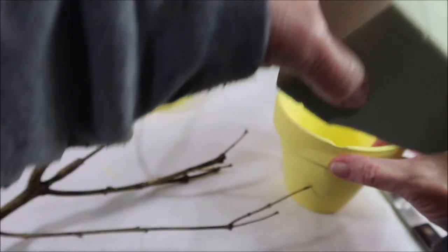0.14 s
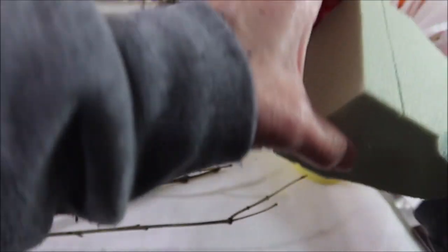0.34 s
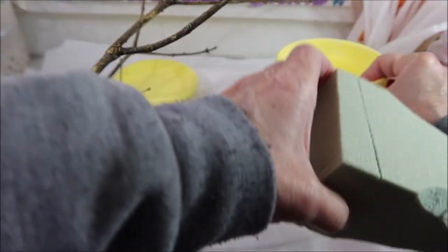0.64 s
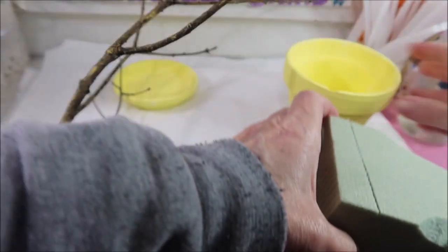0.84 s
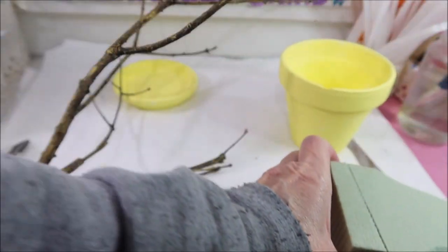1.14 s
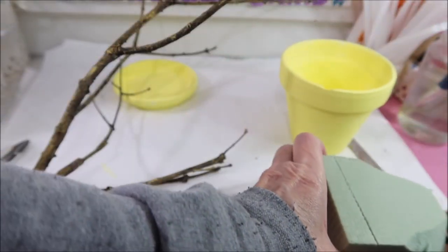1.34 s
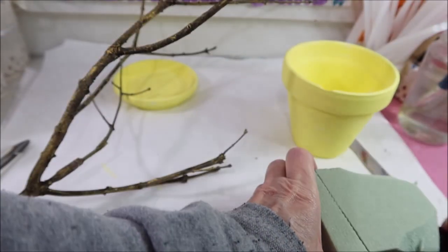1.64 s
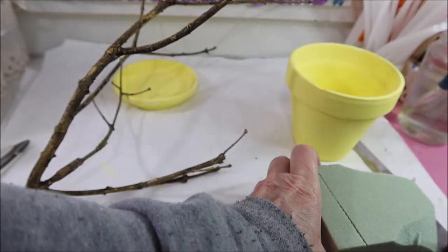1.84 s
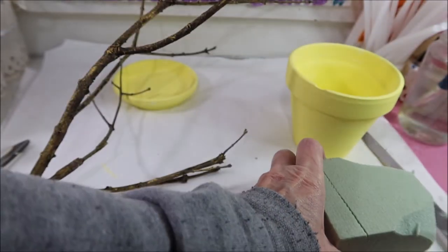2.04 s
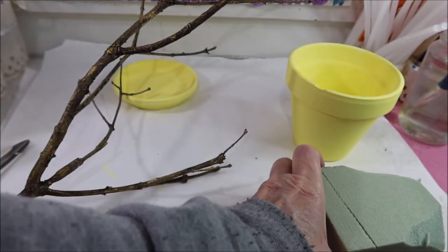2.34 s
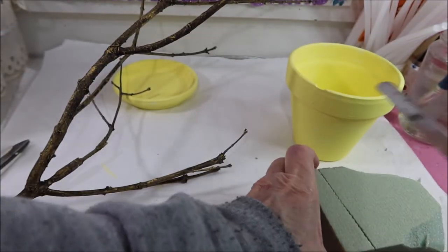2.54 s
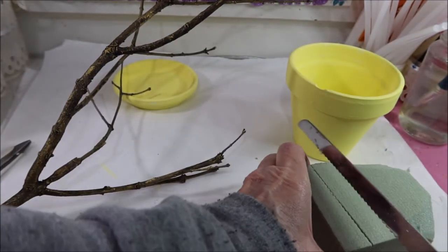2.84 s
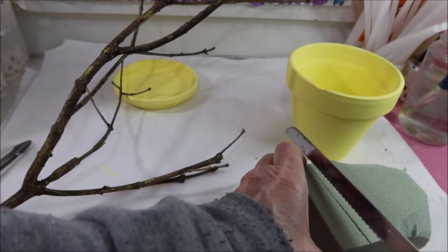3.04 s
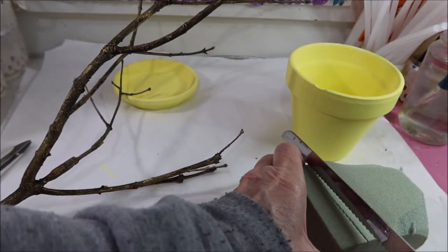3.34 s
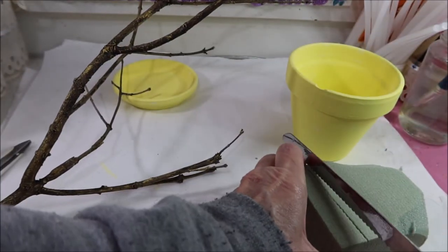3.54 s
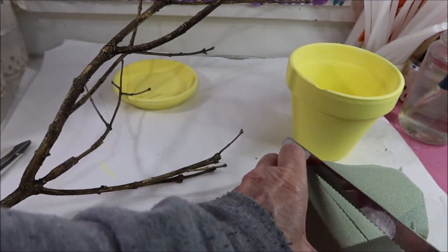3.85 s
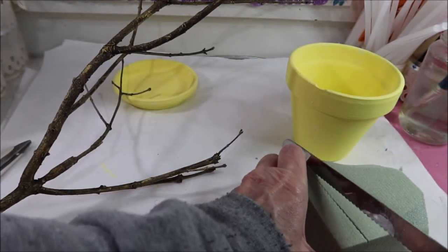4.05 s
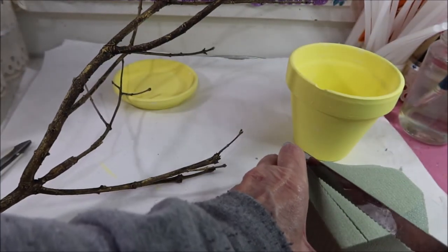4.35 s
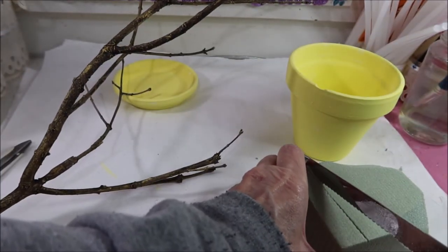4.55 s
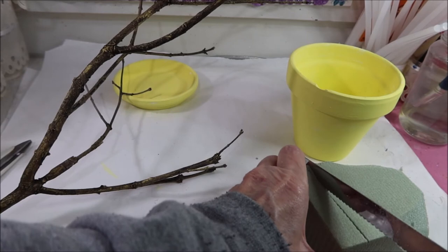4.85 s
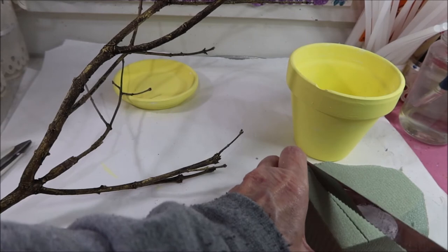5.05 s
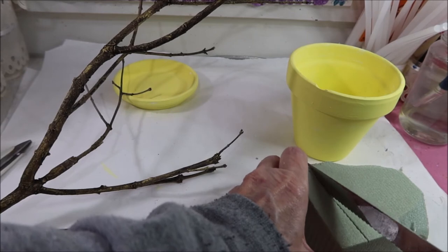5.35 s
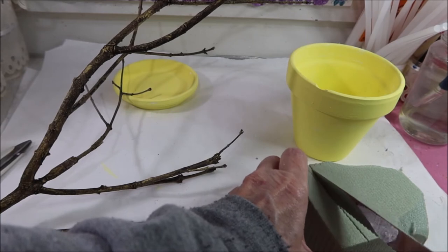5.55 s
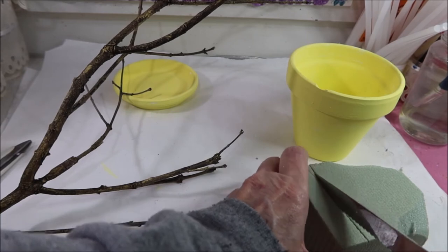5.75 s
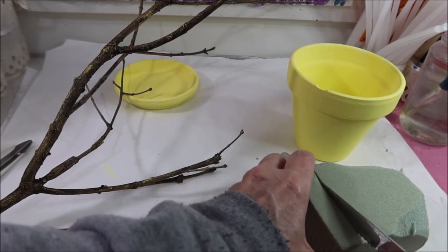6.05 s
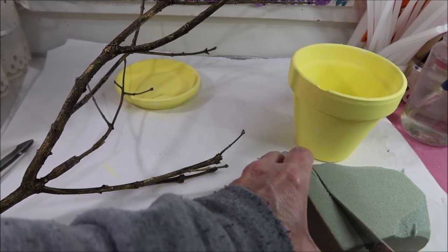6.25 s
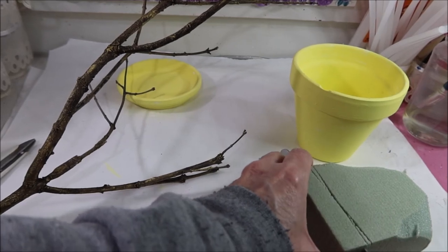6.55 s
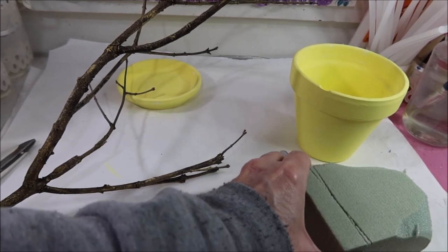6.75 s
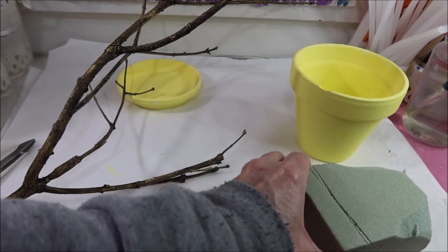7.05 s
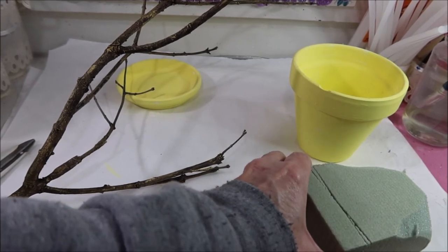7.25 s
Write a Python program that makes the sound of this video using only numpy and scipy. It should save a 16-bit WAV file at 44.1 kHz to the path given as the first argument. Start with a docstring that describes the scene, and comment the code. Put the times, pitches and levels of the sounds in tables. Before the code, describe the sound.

Dry foam rustles and scuffs on a papered table, a clay pot lands with a loud double knock, then a serrated knife rasps scratchily through foam.

```python
"""At a papered work table in a quiet room, a hand slides a clay pot and a block of dry foam: filtered grit
rustles and scuffs. At 0.9 s the pot is set down with a knock and a bounce that ring the table's modes.
From 3.1 s a serrated knife bites in short slips and strokes, then one long push: random cell bursts ring
the block. Two close microphone ports hear the foam from the right; a short echo follows every sound, and
noise of air and far machinery runs throughout."""
import sys
import numpy as np
from scipy import signal
from scipy.fft import rfft, irfft
from scipy.io import wavfile
from scipy.ndimage import uniform_filter1d, map_coordinates

SR = 44100
rng = np.random.default_rng(int(sys.argv[2]) if len(sys.argv) > 2 else 0)


def waveform_to_disk(signal):
    """Save audio, clipped to [-1, 1], as 16-bit WAV at the path in sys.argv[1]."""
    frames = np.transpose(np.atleast_2d(signal))
    scaled = np.clip(frames, -1, 1) * 32767
    samples = np.round(scaled).astype(np.int16)
    wavfile.write(sys.argv[1], SR, samples)


N = 325899

# moments when the teeth break loose: t/s, peak level/dB
SLIPS = [(3.1137, -26.5), (3.1605, -35), (3.262, -35), (3.3049, -32), (3.3277, -23.5), (3.47, -32.5),
         (3.5349, -32), (3.5598, -31.5), (3.6407, -27.5), (3.6575, -30.5), (3.688, -30.5), (3.7315, -19.5),
         (3.8116, -32), (3.9135, -28.5), (3.9654, -34), (4.0148, -36.5), (4.0707, -32.5), (4.1245, -38),
         (4.144, -25.5), (4.2253, -21.5), (4.3051, -23), (4.3615, -34.5), (4.3824, -34), (4.4159, -12.5),
         (4.4682, -27.5), (4.491, -15.5), (4.5232, -13.5), (4.599, -18), (4.618, -13.5), (4.643, -22),
         (4.7184, -17), (4.771, -17.5), (4.8244, -28.5), (4.8688, -34), (4.8954, -25), (4.9182, -25.5),
         (4.9462, -16.5), (4.9686, -13), (5.187, -32), (5.278, -29.5), (5.2992, -16), (5.3154, -18),
         (5.398, -27.5), (5.4246, -14), (5.4494, -23), (5.4744, -23.5), (5.5443, -16), (5.6007, -14.5),
         (5.6237, -15.5), (5.655, -22.5), (5.7673, -27.5), (5.8067, -34), (5.917, -22), (5.96, -20),
         (6.0147, -34), (6.048, -22), (6.2874, -24), (6.643, -19), (6.6777, -17), (6.9027, -19),
         (6.9226, -16), (7.153, -23)]
# the long push through the block: t/s, rasp level/dB, extra brightness/dB
PUSH = [(5.7, -49, 0), (5.822, -38, 3), (6.024, -35.5, 3), (6.07, -21, -0.5), (6.108, -30.5, 0),
        (6.254, -32, 1.5), (6.31, -23, -1.5), (6.594, -27, 1), (6.632, -31, 3), (6.706, -22.5, 5),
        (6.782, -32.5, 0), (6.848, -25.5, 0.5), (6.89, -29, -1), (6.928, -22, -1), (7.102, -22, -2),
        (7.13, -27, -2), (7.154, -18.5, 2.5), (7.214, -22, -2), (7.248, -46.5, -5), (7.36, -49.5, 13),
        (7.38, -19.5, 0.5), (7.39, -14.5, 2.5)]
# the pot's foot dragged over the table: start t/s, length/s, first level/dB, last level/dB,
# table rumble re drag/dB
DRAGS = [(0.24, 0.35, -47, -51.5, 7), (0.727, 0.083, -63, -70, 14), (0.818, 0.14, -40.5, -50, 2),
         (.95, 0.053, -56, -52, 5), (1.14, 0.023, -45, -56, -8), (1.356, 0.32, -53.5, -62, -4),
         (1.67, .14, -54.5, -51.5, -6), (1.838, 0.29, -50, -52.5, -0.5), (2.2, 0.13, -67, -62, -1)]
CREST_DB = 11.5  # a spray of grains is taken to peak this far above its rms level


def saw(tear):
    """Tearing cells ring the block as a bright rasp over a hollow body, both changing with the cut's depth."""
    # rasp spectra, in mid cut and for the shallow and last stages: f/Hz, relative level per Hz/dB
    rasp_spectrum = [(1120, -37), (1900, -19), (1950, -16), (2500, 1.5), (3290, -5), (3920, -6.5),
                     (4600, -7.5), (7620, -10), (13700, -14.5), (14900, -13.5), (15700, -52)]
    outer_spectrum = [(1120, -38), (1900, -17), (2300, 0.5), (4000, -4), (7600, -8.5), (13700, -12.5),
                      (14900, -11.5), (15700, -50)]
    # block resonances in mid cut, while shallow, and as the halves part: f/Hz, width/Hz, level/dB
    block_modes = [(2275, 28, 11.5), (2424, 39, 1.5), (2440, 20, 3), (2680, 30, 4), (2910, 110, 9),
                   (3140, 36, 5), (3463, 120, 1.5), (3813, 190, 7), (3750, 28, 1), (5550, 310, 4.5),
                   (8300, 47, 0)]
    whole_modes = [(2330, 71, 7.5), (2459, 56, 9), (2608, 71, 8), (3753, 150, 8.5), (4690, 120, 4),
                   (5450, 260, 4), (6480, 120, 5.5)]
    parting_modes = [(2770, 27, 8.5), (2890, 38, 6), (3520, 99, 7), (3963, 86, 10.5), (4360, 53, 5),
                     (4900, 100, 6.5), (6550, 140, 5)]
    # body spectra in mid cut, while shallow, and near the far side: f/Hz, relative level per Hz/dB
    body_spectrum = [(260, -54), (450, -13), (631, -5), (818, -8), (910, 0.5), (1350, 2), (1950, -5.5),
                     (2200, 1.5), (2860, -4.5), (4840, -120)]
    shallow_spectrum = [(260, -38), (450, -14), (661, -31), (740, 5), (807, -0.5), (972, 3.5), (1300, -1),
                        (2200, -1), (2860, -18), (4840, -120)]
    through_spectrum = [(260, -28), (450, -15), (807, -12.5), (1070, -1.5), (1240, -5), (1660, -0.5),
                        (1950, -11.5), (2200, -0.5), (2860, -34), (4840, -120)]
    # hollow resonances of the deeper cut: f/Hz, width/Hz, level/dB
    hollow_modes = [(1090, 550, 5.5), (1384, 62, 4), (1746, 150, 9.5)]
    # t/s: the cut deepens over the first two times and nears the far side over the last two
    depth_times = (4.9, 5.6, 6.7, 6.95)
    # body re rasp at those four times: level/dB
    body_levels = (-10.5, -5.5, -3, -6)
    split_hz, snap_db = 3400, 9  # snap re rms of the other cells
    upper_db, upper_db_per_db, reference_db = -2.5, -0.14, -20.5  # upper rasp re whole rasp at reference tear

    t = np.arange(N) / SR
    cells = unit(crackle(12000, spread_db=1.5))
    # each slip opens with the snap of one cell wall
    slip_samples = (np.array(SLIPS)[:, 0] * SR).astype(int)
    cells[slip_samples] += undb(snap_db)

    # a lighter touch moves the same power from the lower to the upper rasp
    tear_db = 20 * np.log10(uniform_filter1d(tear, size=400).clip(1e-4))
    extra_db = (t > PUSH[0][0]) * curves(PUSH)[1]
    upper_share = undb(upper_db + upper_db_per_db * (tear_db - reference_db) + extra_db) ** 2
    upper_share = np.clip(upper_share, .05, .9)

    shallow = np.interp(t, depth_times, (1, 0, 0, 0))
    through = np.interp(t, depth_times, (0, 0, 0, 1))
    midway = 1 - shallow - through
    rasp = shallow * colour(cells, outer_spectrum, whole_modes)
    rasp += through * colour(cells, outer_spectrum, parting_modes)
    rasp += midway * colour(cells, rasp_spectrum, block_modes)

    upper = unit(high(rasp, split_hz, order=3)) * undb(0.74 * walk(23))
    lower = signal.sosfilt(signal.butter(3, split_hz, fs=SR, output="sos"), rasp)
    lower = unit(lower) * undb(1.9 * walk(32))
    rasp = np.sqrt(upper_share) * upper + np.sqrt(1 - upper_share) * lower

    body = shallow * colour(cells, shallow_spectrum)
    body += through * colour(cells, through_spectrum, hollow_modes)
    body += midway * colour(cells, body_spectrum, hollow_modes)
    body_db = np.interp(t, depth_times, body_levels) + 1.2 * walk(20)
    return tear * (rasp + undb(body_db) * body)


def bite():
    """How hard the blade tears: strokes and the long push, roughened by the teeth, with the slips on top."""
    # short strokes of the blade: start t/s, length/s, first level/dB, last level/dB
    short_strokes = [(3.145, 0.058, -74, -51), (3.242, 0.17, -58, -50.5), (3.478, 0.23, -46.5, -49),
                     (3.808, 0.19, -58, -51), (4.057, 0.13, -59, -44), (4.209, 0.096, -41, -39.5),
                     (4.347, 0.081, -58, -39), (4.478, .11, -37.5, -38), (4.601, 0.038, -28, -31.5),
                     (4.665, 0.14, -36, -41), (4.864, 0.11, -53.5, -31.5), (4.992, 0.091, -45.5, -50.5),
                     (5.122, 0.15, -58, -41.5), (5.304, 0.054, -23.5, -40.5), (5.412, 0.072, -34, -39.5),
                     (5.51, 0.058, -37, -30), (5.599, 0.093, -33.5, -42.5)]
    resting_db = -59.5  # the blade creeps in the cut between strokes
    slip_rise_s, slip_t60_s = 0.0033, 0.043

    t = np.arange(N) / SR
    creep = (t > SLIPS[0][0]) * undb(resting_db)
    push = np.where(t > PUSH[0][0], undb(curves(PUSH)[0]), creep)
    grab = np.hypot(strokes(*np.transpose(short_strokes)), push)
    grab = grab * undb(1.1 * walk(30)) * teeth(77, t60=0.058, depth=0.25)

    s, peak_db = np.transpose(SLIPS)
    slips = bursts(s, peak_db - CREST_DB, np.full(len(s), slip_t60_s), np.full(len(s), slip_rise_s))
    return np.hypot(grab, slips)


def teeth(rate, t60, depth):
    """Single teeth catch at random, each adding a short swell to a steady grip; rms 1."""
    catches = np.abs(crackle(rate, spread_db=-1.5))
    swell = signal.lfilter([1], [1, -1000. ** (-1 / (t60 * SR))], catches)
    return unit(1 + depth * uniform_filter1d(swell, size=60))


def rubbing():
    """Fine rustle of foam on paper, its colour wandering, over the duller drag of the pot's foot."""
    # foam and paper rubbed by hand: start t/s, length/s, first level/dB, last level/dB
    hand_moves = [(-0.03, 0.2, -46, -55.5), (0.188, .24, -46, -47), (0.436, 0.1, -57, -54),
                  (0.517, 0.11, -49, -49.5), (0.637, 0.16, -49.5, -53), (0.783, 0.054, -41, -48),
                  (0.89, 0.2, -53, -60), (1.086, 0.085, -49, -58), (1.241, 0.082, -51, -61),
                  (1.357, 0.21, -49, -52), (1.458, 0.12, -43, -41.5), (1.588, 0.28, -55, -48.5),
                  (1.824, 0.18, -40, -40.5), (2.041, 0.11, -44.5, -47), (2.153, 0.13, -42.5, -44.5),
                  (2.303, .09, -47, -52), (2.586, 0.19, -52.5, -56), (2.73, 0.16, -49.5, -64),
                  (2.905, 0.25, -56, -67)]
    # spectra of rustle and drag: f/Hz, relative level per Hz/dB
    rustle_spectrum = [(290, -66), (500, -17.5), (697, -17), (1280, -10), (1590, -13.5), (2310, -2),
                       (3220, 0), (11300, -15), (14200, -15.5), (15700, -27)]
    drag_spectrum = [(290, -38.5), (500, 3.5), (677, -4.5), (736, 1), (1200, -5), (1620, -3.5), (3230, -10),
                     (4500, -14), (5850, -8), (9900, -120)]
    # pot resonances rung by the drag: f/Hz, width/Hz, level/dB
    pot_modes = [(884, 52, 7), (1200, 56, 9), (2230, 220, 5), (3360, 82, 11)]

    paper = colour(crackle(7000, spread_db=0.5), rustle_spectrum)
    thin = high(paper, 4000, order=2)
    paper = undb(3.0 * walk(14)) * thin + undb(1.9 * walk(18)) * (paper - thin)
    rustle = strokes(*np.transpose(hand_moves), attack=0.021) * undb(1.1 * walk(40.2)) * paper

    grit = colour(crackle(3500, spread_db=5.0), drag_spectrum, pot_modes)
    drag = strokes(*np.transpose(DRAGS)[:4]) * undb(2.84 * walk(30.6)) * grit
    return rustle + drag


def scuffs():
    """Pot, block and knife on paper: short sprays of grit, each broad around its own centre."""
    # t/s, peak level/dB, centre f/Hz, t60/s
    sprays = [(.549, -30.5, 4500, .05), (0.663, -33, 3400, .06), (0.708, -31, 3380, 0.06),
              (0.772, -34, 3220, 0.074), (0.7998, -24.5, 2500, 0.054), (0.828, -23.5, 3940, 0.078),
              (0.838, -43, 2180, 0.059), (0.9035, -28.5, 2760, 0.11), (0.91, -25, 1700, 0.068),
              (0.948, -25.5, 5470, 0.016), (1.085, -23.5, 4910, 0.03), (1.151, -32, 2750, 0.041),
              (1.287, -30.5, 2500, 0.069), (1.3563, -38, 4890, 0.12), (1.7519, -36, 2890, 0.051),
              (1.77, -28, 3090, 0.049), (1.8457, -24, 3210, 0.042), (2.025, -28, 3340, 0.18),
              (2.1266, -44, 5110, 0.047), (2.3356, -33, 3270, 0.16), (2.6165, -29.5, 3500, 0.04),
              (2.654, -34.5, 2930, 0.058), (2.747, -32.5, 3530, 0.034), (2.885, -35.5, 1300, .03)]
    out, grit = np.zeros(N), crackle(9000, spread_db=3.0)
    for s, db, hz, t60 in sprays:
        edges = [hz / 2, min(hz * 1.6, .45 * SR)]
        band = signal.sosfilt(signal.butter(1, edges, "band", fs=SR, output="sos"), grit)
        out += bursts([s], [db - CREST_DB], [t60], [.0006]) * unit(band)
    return out


def knocks():
    """Pot on table: squared half-sine pushes ring the top's modes; a softer contact pushes longer."""
    # pot meeting the table: t/s, peak level/dB, contact time/s
    contacts = [(.331, -34, 0.002), (.431, -29.5, .003), (0.447, -30, 0.0033), (0.499, -34.5, .004),
                (0.541, -34, 0.003), (0.84, -26, 0.00042), (0.9078, -2, 0.0012), (0.9134, -2, 0.0016),
                (0.9194, -13, 0.00305), (1.0266, -20, 0.0029), (1.0320, -20, 0.0036), (1.844, -39, 0.0038),
                (1.992, -35, 0.001)]
    # modes of the table top: f/Hz, level/dB, t60/s
    table_modes = [(98, 5.5, 0.12), (172, 0.5, 0.039), (309, 2, 0.036), (400, -3, 0.057), (587, 1.5, 0.035),
                   (773, -6.5, 0.06), (950, -7, 0.029), (1213, -4, 0.054), (1900, -24, .04)]
    out, t = np.zeros(N), np.arange(SR // 3) / SR
    ring = np.zeros(len(t))
    for hz, db, t60 in table_modes:
        ring += undb(db) * np.sin(2 * np.pi * hz * t) * 1000. ** (-t / t60)
    for s, db, contact in contacts:
        push = np.sin(np.pi * np.clip(t[:400] / max(contact, 2e-4), 0, 1)) ** 2
        # an open table top radiates its lowest motion poorly
        blow = high(signal.fftconvolve(ring, push)[:len(t)], hz=168, order=2)
        i = int(s * SR)
        out[i:i + len(t)] += undb(db) * blow / np.abs(blow).max()
    return out


def taps():
    """Light touches, each ringing one short hollow note."""
    # t/s, peak level/dB, pitch f/Hz, t60/s
    touches = [(1.949, -39, 355, .06), (2.126, -42.5, 590, 0.036), (2.886, -37, 460, 0.051)]
    out, t = np.zeros(N), np.arange(N) / SR
    for s, db, hz, t60 in touches:
        out += bursts([s], [db], [t60], [.002]) * np.sin(2 * np.pi * hz * (t - s))
    return out


def shaking(tear):
    """Coarse jolts rumble in the table top, from the dragged pot and then from the blade."""
    # rumble spectra under the pot and under the blade: f/Hz, relative level per Hz/dB
    pot_rumble = [(15, -29), (25, -10), (54, -13), (184, 1.5), (233, -19.5), (321, -6.5), (369, -7),
                  (568, -45), (700, -29), (910, -24), (1540, -120)]
    saw_rumble = [(15, -44), (25, -21), (86, -2), (130, -15), (167, -1.5), (264, -3.5), (303, -4),
                  (700, -10), (910, -51), (1540, -120)]
    saw_shake_db, stir_db = -18, -69  # rumble re tear; the table never lies quite still
    s, length, first_db, last_db, rumble_db = np.transpose(DRAGS)
    jolts = crackle(1200, spread_db=-0.5)
    dragged = strokes(s, length, first_db + rumble_db, last_db + rumble_db)
    dragged = np.hypot(dragged, undb(stir_db + 2.4 * walk(6)))
    sawn = undb(saw_shake_db) * uniform_filter1d(tear, size=600)
    rumble = dragged * colour(jolts, pot_rumble) + sawn * colour(jolts, saw_rumble)
    return undb(1.34 * walk(25)) * rumble


def echo(x):
    """Walls return a short noise tail, much alike at both ports in the bass, unlike in the treble."""
    t60_s, common_db = 0.072, -8.5  # level of the part common to both ports, re direct sound
    bass_side, treble_side_db, treble_hz = 0.37, 4.5, 4530
    t = np.arange(SR // 3) / SR
    decay = 1000. ** (-t / t60_s) * (t > .003)
    mid, low_side, side = rng.standard_normal((3, len(t))) * decay
    side = bass_side * low_side + undb(treble_side_db) * high(side, treble_hz, order=2)
    tails = np.array([mid + side, mid - side]) / np.sqrt(np.sum(mid ** 2))
    return undb(common_db) * signal.fftconvolve(x[None], tails, axes=1)[:, :N]


def room():
    """Air and far machinery as slowly wavering noise; its treble differs between the ports."""
    # f/Hz, relative level per Hz/dB
    room_spectrum = [(12, -30), (20, -4.5), (74, -2.5), (98, -4), (203, -1), (240, -6.5), (335, -7),
                     (385, -5), (817, -15.5), (889, -12.5), (1210, -15), (15700, -35.5)]
    common_db, bass_side = -51.5, .2  # mean level of the part common to both ports; side gain
    mid, side = (colour(rng.standard_normal(N), room_spectrum) for _ in range(2))
    side = bass_side * side + high(side, 1130, order=1)
    return undb(common_db + 0.38 * walk(3.05)) * np.array([mid + side, mid - side])


def ports(x, left_db):
    """Sound reaches the left port slightly later; the lag wanders with the spot that sounds."""
    lag_s, spread_s = 2.4e-5, 1.1e-5
    lag = SR * (lag_s + spread_s * walk(200))
    left = map_coordinates(x, [np.arange(N) - lag], order=5, mode="nearest")
    return np.array([left * undb(left_db / 2), x * undb(-left_db / 2)])


def strokes(start, length, first_db, last_db, attack=0.0089):
    """Envelope of slides: each sets in over attack (s), glides from first to last level and dies away."""
    release_t60_s = 0.15
    power = np.zeros(N)
    for s, hold, a_db, b_db in zip(start, length, first_db, last_db):
        i = max(int(s * SR), 0)
        count = min(int((hold + release_t60_s) * SR), N - i)
        t = np.arange(count) / SR - min(s, 0)  # a move begun before time zero enters part-way
        release = 1000. ** (-np.maximum(t - hold, 0) / release_t60_s)
        shape = np.clip(t / attack, 0, 1) * release
        power[i:i + len(t)] += (shape * undb(np.interp(t, (0, hold), (a_db, b_db)))) ** 2
    return np.sqrt(power)


def bursts(s, peak_db, t60, rise):
    """Envelope of sudden swells, each starting one rise time ahead of its moment and dying away."""
    out, t = np.zeros(N), np.arange(SR // 4) / SR
    for at, db, decay, up in zip(s, peak_db, t60, rise):
        shape = (1 - np.exp(-t / max(up, 1e-4))) ** 2 * 1000. ** (-t / max(decay, .01))
        i = max(int((at - up) * SR), 0)
        out[i:i + len(t)] += (undb(db) * shape / shape.max())[:N - i]
    return out


def crackle(rate, spread_db):
    """Impulses at random moments, rate per second, of random sign, strength and exponential dB offset."""
    pick, size, sign = rng.random(N), rng.exponential(size=N), rng.standard_normal(N)
    return (pick < rate / SR) * undb(spread_db * np.minimum(size, 5)) * sign


def walk(rate):
    """Random levels held 1 / rate s and smoothed twice; spread near 1."""
    k = int(SR / rate)
    held = np.repeat(rng.standard_normal(N // k + 1), k)
    return 1.3 * uniform_filter1d(uniform_filter1d(held, k), k)[:N]


def colour(x, points, peaks=()):
    """Minimum-phase filter with the given spectrum and resonances; rms 1."""
    hz = np.maximum(np.arange(2049) * SR / 4096, 1)
    point_hz, point_db = np.array(points)[:, 0], np.array(points)[:, 1]
    db = np.interp(np.log(hz), np.log(point_hz), point_db)
    for centre, width, peak_db in peaks:
        db = db + peak_db / (1 + (2 * (hz - centre) / width) ** 2)
    # folding the cepstrum onto positive times makes the filter causal
    cepstrum = irfft(db * np.log(10) / 20)
    cepstrum[1:2048] *= 2
    cepstrum[2049:] = 0
    response = irfft(np.exp(rfft(cepstrum)))
    return unit(signal.fftconvolve(x, response)[:N])


def high(x, hz, order):
    """Butterworth high-pass."""
    return signal.sosfilt(signal.butter(order, hz, "high", fs=SR, output="sos"), x)


def curves(table):
    """Columns after the first, drawn as sample-rate curves over time."""
    s, *columns = np.transpose(table)
    return [np.interp(np.arange(N) / SR, s, c) for c in columns]


def undb(db):
    """Gain of a level in dB."""
    return 10 ** (np.asarray(db) / 20)


def unit(x):
    """Scaled to rms 1."""
    return x / np.sqrt(np.mean(x ** 2))


def scene():
    """Foam and table reach the ports from their own sides; the walls answer both."""
    tear = bite()
    foam = saw(tear) + rubbing() + scuffs()
    table = knocks() + taps() + shaking(tear)
    direct = ports(foam, left_db=-1) + ports(table, left_db=.5)
    return direct + echo(foam + table) + room()


def record(dry):
    """The recorder cuts the top above 15.8 kHz with a steep elliptic low-pass."""
    return signal.sosfilt(signal.ellip(12, .2, 90, 15800, fs=SR, output="sos"), dry)


dry = scene()
out = record(dry)
waveform_to_disk(out)
```